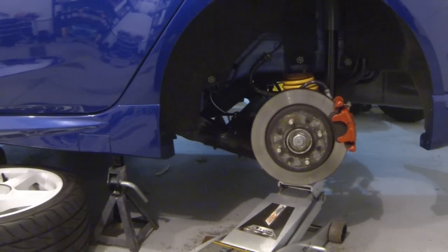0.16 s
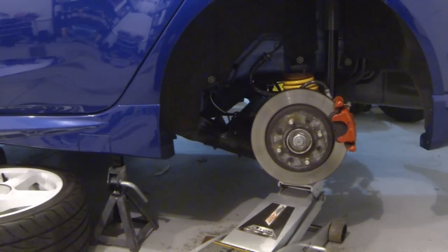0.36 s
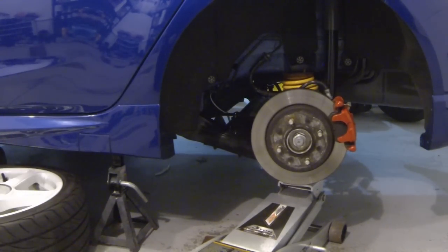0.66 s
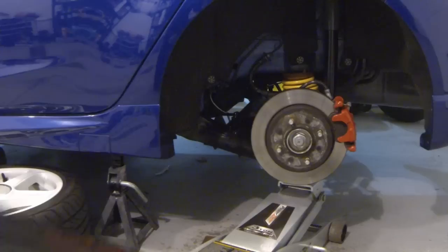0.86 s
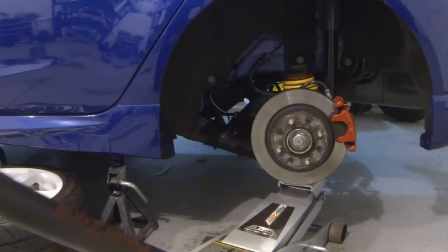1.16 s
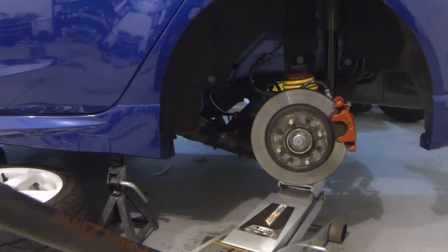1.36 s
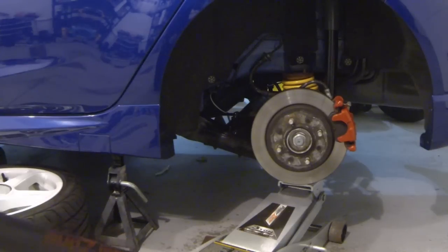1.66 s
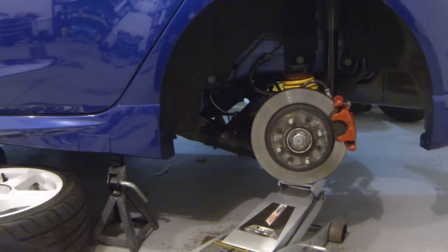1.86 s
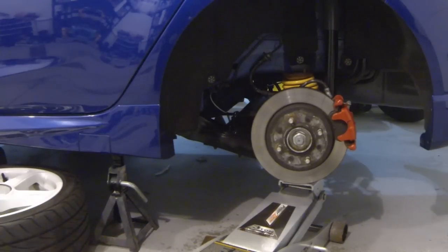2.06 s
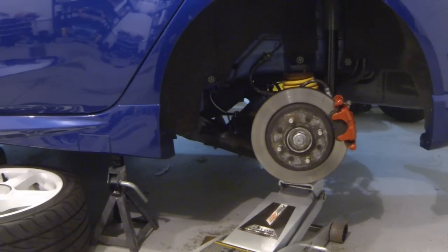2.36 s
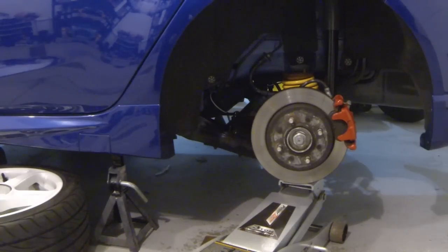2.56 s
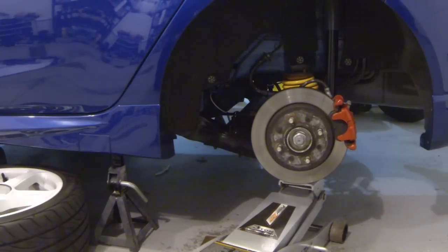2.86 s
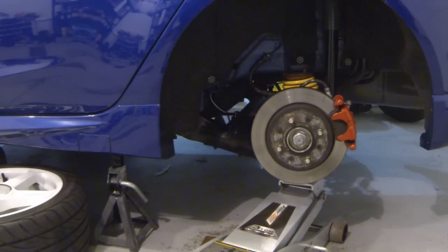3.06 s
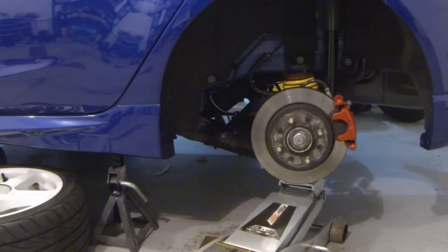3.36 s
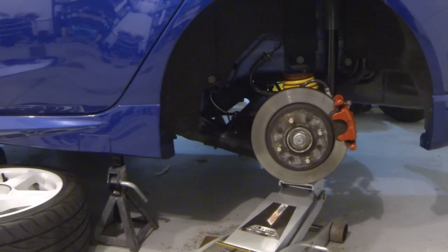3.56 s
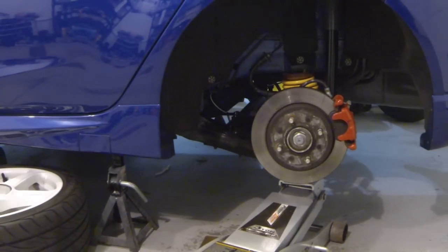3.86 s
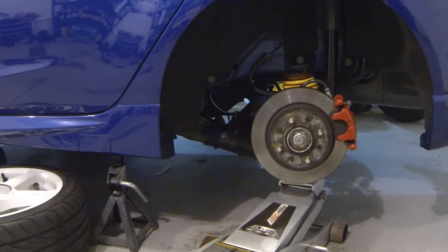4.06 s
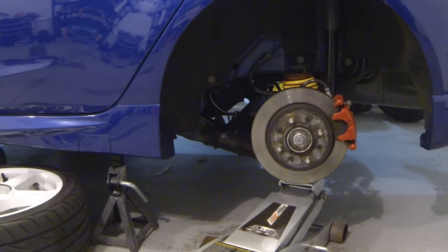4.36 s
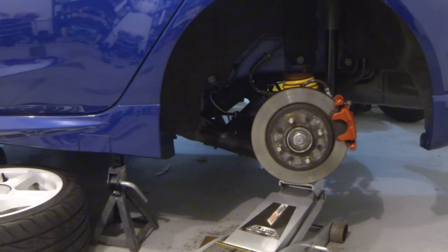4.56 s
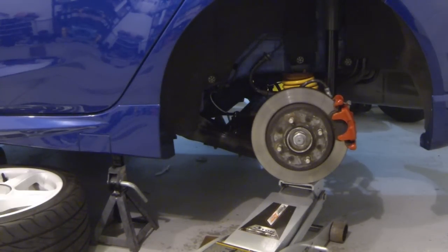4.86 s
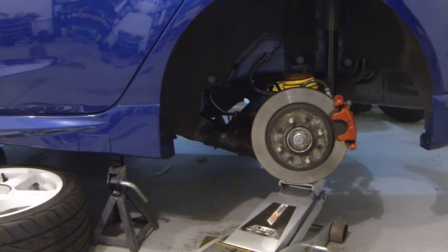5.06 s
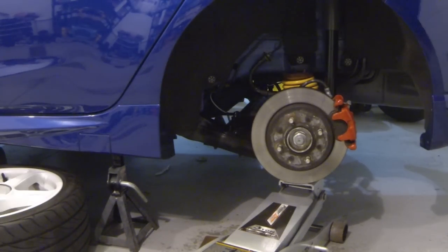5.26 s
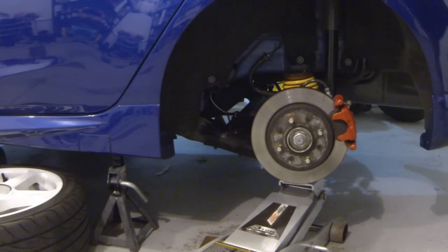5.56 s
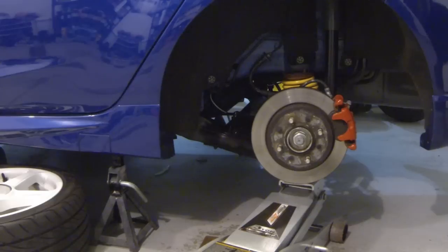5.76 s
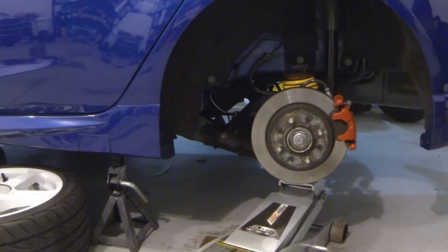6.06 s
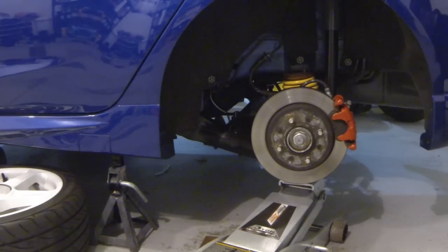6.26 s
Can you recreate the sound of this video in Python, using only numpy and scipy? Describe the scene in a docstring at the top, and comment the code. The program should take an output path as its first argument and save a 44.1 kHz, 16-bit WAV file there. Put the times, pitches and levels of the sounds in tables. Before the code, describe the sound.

In a humming garage, a metal jack handle clicks and creaks, then a heavy ringing thump, followed by shoes stepping and scuffing on gritty concrete.

```python
"""A car is raised on a hydraulic floor jack in a garage, over a ventilation hum of filtered noise.
First the handle clacks and turns: shaped pulses, slip ticks and ringing tube modes. Just after 2 s it hits
its stop with a heavy thump: dull blows, low jolts, a ringing steel frame and a buzz of loose parts.
Then someone steps about on gritty concrete and drags a shoe: knocks, thuds and slaps, low booms, bursts of
grit and scuffs of coloured grain noise. One last handle clack falls among the steps."""
import sys
import numpy as np
from scipy import signal
from scipy.fft import rfft, irfft, next_fast_len
from scipy.io import wavfile
from scipy.ndimage import uniform_filter1d

SR = 44100
rng = np.random.default_rng(int(sys.argv[2]) if len(sys.argv) > 2 else 0)


def generate_wav(sig):
    """Save sig (samples, or channels by samples) to the path in sys.argv[1] as 16-bit PCM at SR."""
    pcm = np.round(np.clip(np.atleast_2d(sig).T, -1, 1) * 32767).astype(np.int16)
    wavfile.write(sys.argv[1], SR, pcm)


N = 282681
TIME = np.arange(N) / SR
BINS = np.fft.rfftfreq(4096, 1 / SR)  # pitch of each bin of a pulse spectrum, Hz
BLOW = np.sqrt(.004 * SR)  # a blow's level is its rms over 4 ms


def amp(db):
    """Turns decibels into an amplitude factor."""
    return 10 ** (np.asarray(db) / 20)


def evened(x):
    """Brings x to an rms of 1."""
    return x / np.sqrt(np.mean(x ** 2) + 1e-20)


def read(points, hz):
    """Reads a curve drawn through points along a logarithmic pitch axis."""
    pitch_hz, value = np.transpose(points)
    return np.interp(np.log(hz + 1), np.log(pitch_hz + 1), value)


def spectrum(colour):
    """Turns a colour curve into the amplitudes of a pulse spectrum."""
    return amp(read(colour, BINS))


def add(mix, start_s, sound):
    """Mixes a sound in at its start time, cut off at the end of the mix."""
    part = mix[..., round(start_s * SR):][..., :sound.shape[-1]]
    part += sound[..., :part.shape[-1]]


def coloured(x, colour):
    """Gives x a spectrum, at unit level."""
    size = next_fast_len(len(x))
    gain = amp(read(colour, np.fft.rfftfreq(size, 1 / SR)))
    return evened(irfft(rfft(x, size) * gain, size)[:len(x)])


def grains(per_s, spread_db):
    """A random train of clicks of uneven size."""
    size = amp(spread_db * np.minimum(rng.exponential(1, N), 4)) * rng.standard_normal(N)
    return size * (rng.random(N) < per_s / SR)


def band(hz, width):
    """Noise through one resonance, at unit level."""
    size = next_fast_len(N)
    detune = 2 * (np.fft.rfftfreq(size, 1 / SR) - hz) / width
    noise = rfft(rng.standard_normal(size))
    return evened(irfft(noise / (1 + detune ** 2), size)[:N])


def swell(u):
    """Rises from nothing to 1 at u = 1, then dies away more slowly."""
    u = np.maximum(u, 0)
    return u * np.exp(1 - u)


def pulse(gain, spread=0.0014, spread_hz=1500):
    """A causal pulse with this spectrum; bending waves spread it, the treble arriving first."""
    # folding the cepstrum forward in time gives the minimum-phase pulse
    cepstrum = irfft(np.log(gain + 1e-9))
    cepstrum[1:len(BINS) - 1] *= 2
    cepstrum[len(BINS):] = 0
    lag = 2 * np.pi * spread * spread_hz * np.arctan(BINS / spread_hz)
    return BLOW * irfft(np.exp(rfft(cepstrum) - 1j * lag))


def contact(hz, centre_hz, sharpness=1):
    """A blow is strongest near the pitch that its contact sets."""
    return 1 / np.hypot(1, sharpness * (hz / centre_hz - centre_hz / (hz + 0.0018)))


def ring(modes, weights, onset=0.0015):
    """Dying sines that swell over the time of contact, every other mode swinging the opposite way."""
    t = TIME[:SR]
    sines = np.zeros(SR)
    for k, (hz, db, t60) in enumerate(modes):
        sines += (-1) ** k * weights[k] * amp(db - 60 * t / t60) * np.sin(2 * np.pi * hz * t)
    return sines * (1 - np.exp(-(t / onset) ** 2)) ** 2


def placed(sound, room_db):
    """Two rows: what is heard straight and what goes into the room."""
    return np.outer([1, amp(room_db)], sound)


# Spectrum of the steady air noise: pitch_hz, level_db
AIR_COLOUR = [(12, -31), (20, 2), (92, -4), (118, -7.5), (174, -14), (211, -14), (235, -15.5), (302, -16),
              (398, -18.5), (497, -20.5), (966, -24.5), (1730, -29.5), (2930, -31.5), (4820, -35.5),
              (15000, -48.5)]
# Fan and duct tones, the widest a broad wash: pitch_hz, width_hz, level_db
HUM_TONES = [(58.9, 15, -64.5), (524, 30, -83), (903, 35, -89), (1656, 64, -86.5), (2999, 3.1, -81.5),
             (2983, 1050, -71)]
# Level of the low drone, which swells and then sinks before 2 s: time_s, level_db
DRONE_LEVEL = [(0, -64), (.4, -58.5), (1.3, -60.5), (1.7, -70), (6.41, -69.5)]
AIR_DB = -56.42


def ventilation():
    """Air noise with a few wavering tones and a low drone, all filtered from noise."""
    out = amp(AIR_DB) * coloured(rng.standard_normal(N), AIR_COLOUR)
    out += amp(np.interp(TIME, *np.transpose(DRONE_LEVEL))) * band(hz=82.3, width=9.5)
    for hz, width, db in HUM_TONES:
        out += amp(db) * band(hz, width)
    return out


# Spectrum of the heel, for the shuffle and the steps: pitch_hz, level_db
HEEL_COLOUR = [(10, -33), (150, 6), (400, 6), (1050, 2), (1450, -34), (3000, -49), (15000, -55)]
SHUFFLE_FROM_S, SHUFFLE_TO_S, SHUFFLE_PER_S = 3.2, 4.95, 30
SHUFFLE_DB, SHUFFLE_HZ = -67.5, 202


def shuffle():
    """Soft random bumps of the shoes as the weight shifts between the footfalls."""
    bump = pulse(spectrum(HEEL_COLOUR) * contact(BINS, SHUFFLE_HZ, sharpness=0.92))
    moving = (TIME > SHUFFLE_FROM_S) & (TIME < SHUFFLE_TO_S)
    taps = rng.uniform(0.82, 1, N) * (rng.random(N) < SHUFFLE_PER_S / SR)
    bumps = evened(signal.fftconvolve(taps, bump)[:N])
    return placed(amp(SHUFFLE_DB) * moving * bumps, room_db=-9.5)


# Soft booms of the weight shifting: start_s, level_db, pitch_hz
WEIGHT_BOOMS = [(3.373, -29.5, 108), (3.392, -42.5, 223), (3.509, -39.5, 252), (3.515, -37, 117),
                (3.532, -39.5, 235), (3.556, -42, 163), (3.665, -40.5, 165), (3.685, -34, 124),
                (3.719, -40, 98)]
BOOM_WIDTH_HZ = 51


def booms():
    """Each boom is a pulse with its own pitch that dies within a few cycles."""
    out = np.zeros(N)
    for start_s, db, hz in WEIGHT_BOOMS:
        resonance = contact(BINS, hz, hz / BOOM_WIDTH_HZ) ** 2
        add(out, start_s, amp(db) * pulse(evened(resonance)))
    return placed(out, room_db=-11.5)


# Single grains snapping: start_s, level_db
GRAIN_SNAPS = [(3.566, -51), (4.812, -58.5), (4.817, -66)]
# Spectrum of a snap: pitch_hz, level_db
SNAP_SPECTRUM = [(1000, -14), (4500, -10), (5700, 6), (7300, -13), (10000, -5), (12600, -10), (15000, -28)]


def snaps():
    """A lone grain of sand breaks with one thin, crisp tick."""
    out = np.zeros(N)
    tick = pulse(evened(spectrum(SNAP_SPECTRUM)), spread=0.0003, spread_hz=7200)
    for start_s, db in GRAIN_SNAPS:
        add(out, start_s, amp(db) * tick)
    return placed(out, room_db=-10)


# Grit cracking under a sole, peaking at half its length: start_s, level_db, length_s, brightest_pitch_hz
GRIT_BURSTS = [(3.374, -49.5, .007, 1630), (3.401, -55, .004, 1700), (3.464, -56.5, 0.0085, 5200),
               (3.488, -45.5, .003, 1710), (3.498, -54.5, 0.0053, 4400), (3.548, -52, 0.0035, 4800),
               (3.559, -44.5, 0.002, 4900), (3.565, -42, 0.0033, 7000), (3.581, -50.5, 0.0052, 5200),
               (3.608, -52, 0.0064, 5230), (3.665, -59, 0.011, 1190), (4.134, -52, 0.0042, 4070),
               (4.1662, -49, 0.0033, 5000), (4.1694, -45.5, 0.0032, 7860), (4.2012, -52, .002, 4400)]
# Spectrum of cracking grit: pitch_hz, level_db
GRIT_SPECTRUM = [(300, -14), (900, 19.5), (1500, 12), (2600, 6.5), (3700, 7.5), (4350, -1.5), (5100, 6.5),
                 (6100, -9.5), (6800, -9.5), (7900, -17), (9200, -4), (10000, -4), (10700, -22),
                 (12000, -8), (15000, -22)]
CRUMBS_DB, CRUMBS_LENGTHS = -25.5, 8.1  # the crumbs crackle on, softer and this many times longer


def grit():
    """Sand grains burst under the shoe in brief clusters, then crumble; finer grains sound higher."""
    out, t = np.zeros(N), TIME[:SR // 4]
    hz, colour_db = np.transpose(GRIT_SPECTRUM)
    for start_s, db, length, centre_hz in GRIT_BURSTS:
        tilt_db = 20 * np.log10(contact(hz, centre_hz, sharpness=1.8))
        colour = np.transpose([hz, colour_db + tilt_db])
        u = t / (length / 2)
        burst = swell(u) + amp(CRUMBS_DB) * swell(u / CRUMBS_LENGTHS)
        crackle = coloured(grains(per_s=16000, spread_db=3.0)[:len(t)], colour)
        add(out, start_s, amp(db) * burst * crackle)
    return placed(out, room_db=-9.0)


# Scuffs of a sole on concrete: start_s, time_to_top_speed_s, rub_db, rasp_db, sandy_hiss_db
SOLE_SCUFFS = [(2.93, 0.15, -66.5, -69.5, -80), (3.37, 0.17, -58, -62.5, -73), (3.98, 0.12, -63, -70, -72),
               (4.2, 0.023, -57, -53.5, -71), (4.23, 0.048, -58, -60, -81), (4.3, 0.3, -62.5, -78, -90),
               (4.75, 0.07, -58.5, -67, -72), (5.28, 0.16, -63, -60.5, -60.5), (5.395, .045, -54, -72, -60),
               (5.49, 0.051, -59.5, -64, -60.5), (5.54, 0.074, -57.5, -58.5, -67),
               (5.61, 0.066, -58, -57.5, -68), (5.66, 0.2, -62.5, -63.5, -66.5)]
# Spectrum of the dull rub: pitch_hz, level_db
RUB_COLOUR = [(60, -19), (200, -6.5), (360, 0), (480, -3), (620, 2), (920, 2.5), (1200, -13), (2600, -15),
              (4000, -20), (7000, -67), (15000, -52)]
# Spectrum of the tread catching: pitch_hz, level_db
RASP_COLOUR = [(200, -25), (900, 0.5), (1500, 1.5), (2100, -0.5), (2900, -1), (3800, -4.5), (4600, -18),
               (7000, -32), (15000, -47)]
# Spectrum of the rolling grains: pitch_hz, level_db
SAND_COLOUR = [(500, 0), (2000, -10.5), (3800, 4), (4500, -2), (5300, 2), (6800, -10.5), (9500, -10.5),
               (11000, -16), (13500, -17), (15000, -23)]
RUB_POWER, RASP_POWER, SAND_POWER = 1.22, 2.65, 3  # how each follows the speed


def slides(uneven_db=1.2, uneven_s=0.02):
    """The sole speeds up and coasts to rest, gripping unevenly: dull rub, rasping tread, sandy grains."""
    rub_level, rasp_level, sand_level = np.zeros((3, N))
    for start_s, rise_s, rub_db, rasp_db, sand_db in SOLE_SCUFFS:
        speed = swell((TIME - start_s) / rise_s)
        # overlapping scuffs add in power
        rub_level = np.hypot(rub_level, amp(rub_db) * speed ** RUB_POWER)
        rasp_level = np.hypot(rasp_level, amp(rasp_db) * speed ** RASP_POWER)
        sand_level = np.hypot(sand_level, amp(sand_db) * speed ** SAND_POWER)
    rub = rub_level * coloured(grains(per_s=2500, spread_db=0.5), RUB_COLOUR)
    rasp = rasp_level * coloured(grains(per_s=6000, spread_db=1.0), RASP_COLOUR)
    sand = sand_level * coloured(grains(per_s=6500, spread_db=1.5), SAND_COLOUR)
    grip = evened(uniform_filter1d(rng.standard_normal(N), round(uneven_s * SR)))
    return placed(amp(uneven_db * grip) * (rub + rasp + sand), room_db=-13)


# Footfalls, the last row a hard echo of the 5.400 s step off a nearby surface: start_s, knock_db,
# knock_pitch_hz, thud_db, slap_db, room_db
FOOTFALLS = [(2.629, -47.5, 455, -62, -57, -15), (3.267, -57, 900, -70, -58, -6),
             (3.360, -48.5, 418, -49, -64, 3), (3.376, -47.5, 745, -49, -55, -1),
             (3.487, -37, 440, -39, -43.5, -7.5), (3.582, -41, 416, -41, -60, -7),
             (3.666, -47.5, 710, -46, -59, -5.5), (3.672, -50, 600, -51, -60, -8.5),
             (3.8318, -49, 417, -51, -54.5, -9.5), (4.1282, -40.5, 710, -43.5, -55, -2.5),
             (4.2012, -38, 980, -53, -48, -7), (4.247, -44, 570, -68, -56, -25),
             (4.336, -48.5, 345, -49, -81, -7), (4.358, -44, 221, -53, -69, -8),
             (4.604, -61, 750, -62, -74, -8), (4.639, -51, 353, -55, -68, -5.5),
             (4.763, -46.5, 228, -47.5, -78, -3.5), (4.785, -55, 750, -62, -60, -2),
             (4.805, -52, 400, -48, -70, -5), (4.8697, -40.5, 438, -51, -60, -4.5),
             (5.143, -52.5, 320, -46.5, -61, -8.5), (5.325, -52, 520, -48.5, -72, 5.5),
             (5.400, -35.5, 515, -43, -49.5, -3.5), (5.4119, -39, 700, -52, -62, 1)]
# Spectrum of the weight coming down: pitch_hz, level_db
THUD_COLOUR = [(8, -21), (40, 5.5), (70, -4.5), (112, -2), (160, -11), (205, -9), (245, 0), (300, -29),
               (1000, -38), (15000, -88)]
# Spectrum of the flat of the sole: pitch_hz, level_db
SLAP_COLOUR = [(200, -16), (800, 18), (1100, 10.5), (1700, 17.5), (2300, -7.5), (3600, 7), (6000, -46),
               (15000, -43)]
ROLL_S, ROLL_DB = 0.00645, -18  # the ball of the foot lands after the heel, softer


def steps(sharpness=2.5):
    """Each footfall blends a heel knock, a thud of weight and a slap of the sole, then rolls forward."""
    out = np.zeros((2, N))
    heel = evened(spectrum(HEEL_COLOUR))
    thud = evened(spectrum(THUD_COLOUR))
    slap = evened(spectrum(SLAP_COLOUR))
    for start_s, knock_db, hz, thud_db, slap_db, room_db in FOOTFALLS:
        knock = evened(heel * contact(BINS, hz, sharpness))
        power = amp([knock_db, thud_db, slap_db]) ** 2 @ np.array([knock, thud, slap]) ** 2
        add(out, start_s, placed(pulse(np.sqrt(power), spread=0.00091), room_db))
        ball = amp(knock_db + ROLL_DB) * pulse(knock, spread=0.00063)
        add(out, start_s + ROLL_S, placed(ball, room_db))
    return out


# What the handle rings with: pitch_hz, level_db, t60_s
HANDLE_MODES = [(313, -8.5, 0.48), (513, -1, 0.53), (590, -4.5, 0.39), (798, -17, 0.32), (858, -6.5, 0.2),
                (917, -4.5, 0.31), (1020, -6, 0.095), (1095, -27, 0.48), (1385, -7, 0.14),
                (1453, -8, 0.093), (1630, -16, 0.21), (1690, -16.5, 0.3), (1778, -2, 0.067),
                (1950, -26, .4)]


def tube_ring(centre_hz, sharpness=1.7, onset=0.0015):
    """The handle tube rings most in the modes near the pitch of the contact."""
    weights = contact(np.transpose(HANDLE_MODES)[0], centre_hz, sharpness)
    return ring(HANDLE_MODES, weights, onset)


# Turns of the handle in its socket: start_s, length_s, level_db
HANDLE_TURNS = [(0.486, 0.18, -65.5), (0.586, 0.035, -63), (0.684, .13, -63), (0.847, 0.037, -64.5),
                (1.352, 0.079, -65), (1.46, 0.035, -62)]
# Spectrum of the handle's ticks and clacks: pitch_hz, level_db
CLACK_SPECTRUM = [(20, -40), (350, 4), (600, 5), (740, -0.5), (950, 3.5), (1220, -4.5), (1450, 1),
                  (1800, -6.5), (2400, -7), (3500, -17), (8000, -77), (15000, -93)]


def twist(arch=0.35, tick_db=-1):
    """Tiny slips in the socket tick and keep the tube ringing; each turn swells and eases off."""
    slips = grains(per_s=200, spread_db=1.5)
    tube = signal.fftconvolve(slips, tube_ring(1000))[:N]
    tick = pulse(spectrum(CLACK_SPECTRUM) * contact(BINS, 1200, sharpness=0.86))
    ticks = signal.fftconvolve(slips, tick)[:N]
    effort = np.zeros(N)
    for start_s, length, db in HANDLE_TURNS:
        progress = np.clip((TIME - start_s) / length, 0, 1)
        effort += amp(db) * abs(np.sin(np.pi * progress)) ** arch
    friction = evened(evened(tube) + amp(tick_db) * evened(ticks))
    return placed(effort * friction, room_db=-10.5)


# Clacks of the jack handle: start_s, click_db, ring_db, brightest_pitch_hz, change_per_bounce_db
HANDLE_CLACKS = [(0.172, -54, -56, 1160, -12), (0.18, -69, -59, 1770, -11), (0.222, -77, -57.5, 1760, -10),
                 (1.371, -63, -61, 1280, 0.5), (1.394, -66, -63, 1200, -6), (1.472, -58, -61, 916, -4),
                 (1.504, -37.5, -34, 1500, -1), (1.764, -67, -63, 810, -8), (1.965, -54, -59, 1050, -5),
                 (2.391, -65.5, -53, 1700, -10), (5.094, -55, -57, 1947, -13)]
# each bounce comes this much later, at this share of the pitch, and rings the tube less
CHATTER_S, CHATTER_PITCH, CHATTER_RING_DB = .0064, 0.73, -18


def handle(room_db=-3.5):
    """Play in the handle socket: a click and the short ring of the tube, then two quick bounces."""
    out = np.zeros((2, N))
    for start_s, click_db, ring_db, top_hz, bounce_db in HANDLE_CLACKS:
        for k in range(3):
            at, hz = start_s + k * CHATTER_S, top_hz * CHATTER_PITCH ** k
            colour = spectrum(CLACK_SPECTRUM) * contact(BINS, hz, sharpness=2.0) ** 2
            click = pulse(evened(colour), spread=0.00151)
            add(out, at, placed(amp(click_db + k * bounce_db) * click, room_db))
            tube_db = ring_db + k * (bounce_db + CHATTER_RING_DB)
            add(out[0], at, amp(tube_db) * tube_ring(hz))
    return out


# Spectrum of a heavy impact on the jack: pitch_hz, level_db
IMPACT_COLOUR = [(8, -25), (25, 0.5), (60, 33), (200, 12), (380, 7), (640, 12.5), (770, 1.5), (1060, 8.5),
                 (1200, 0), (1600, 0.5), (2100, -16), (4000, -45), (8000, -51), (15000, -57)]


def blow(db, hz, sharpness):
    """One dull impact on the jack."""
    colour = spectrum(IMPACT_COLOUR) * contact(BINS, hz, sharpness)
    return amp(db) * pulse(evened(colour), spread=0.00164)


# Spectrum of the loose steel parts: pitch_hz, level_db
LOOSE_PARTS_COLOUR = [(300, -32), (1900, -2), (2400, 3), (2700, -3.5), (3200, 5.5), (3600, -12), (4050, -4),
                      (4400, -22), (5600, -9.5), (7000, -31), (10500, -32), (11500, -26), (12500, -42)]


def loose_parts(level_db=-50, rise_s=0.018, t60_s=0.8):
    """Loose steel parts buzz as a dense train of grains that builds quickly and dies away."""
    buzz = coloured(grains(per_s=3700, spread_db=1.5), LOOSE_PARTS_COLOUR)
    return buzz * (1 - np.exp(-TIME / rise_s)) * amp(level_db - 60 * TIME / t60_s)


# What the loaded jack frame rings with: pitch_hz, level_db, t60_s
FRAME_MODES = [(28.8, 5, 0.88), (59, 5, 0.45), (82, -7, 0.44), (111, -2, 0.29), (201.4, 1.5, 0.37),
               (239.6, -1, 0.54), (430, -22, 0.33), (492, -13, 0.34), (511, 2, 0.33), (603, -12, 0.42),
               (646, 0, 0.25), (680, -16, 0.21), (670, -6, 0.19), (912, -19, 0.38), (991, -2, 0.19),
               (1080, -16, 0.29), (1110, -13, 0.66), (1290, -16, 0.45), (1324, -15, 0.6), (1388, -1, 0.12),
               (1685, -22, .9), (2415, -18, 0.46), (3000, -20, 1.1), (3230, -30, 0.92), (3980, -33, 0.5)]
# The handle hits its stop and clatters against it: start_s, level_db, pitch_hz
STOP_HITS = [(2.1249, -31.5, 930), (2.1285, -29, 690), (2.1351, -43, 556), (2.145, -34.5, 1510),
             (2.1605, -35, 644), (2.168, -43, 900), (2.198, -39, 800), (2.211, -48, 600)]
# The car's weight answers with low jolts: start_s, level_db
LOAD_JOLTS = [(2.14, -31), (2.151, -30), (2.176, -38), (2.189, -32), (2.211, -32.5), (2.378, -40.5)]
TOUCH_S, TOUCH_DB, TOUCH_HZ, TOUCH_RISE_S = 2.115, -34, 1000, 0.0021  # slack taken up just before the hit
FRAME_S, FRAME_DB, JOLT_HZ, BUZZ_S = 2.13, -39, 111, 2.12


def thump(room_db=-6, load_room_db=-13):
    """The handle hits its stop and clatters; the load jolts, the frame rings and loose parts buzz."""
    out = np.zeros((2, N))
    add(out[0], TOUCH_S, amp(TOUCH_DB) * tube_ring(TOUCH_HZ, sharpness=6.1, onset=TOUCH_RISE_S))
    for start_s, db, hz in STOP_HITS:
        add(out, start_s, placed(blow(db, hz, sharpness=0.63), room_db))
    for start_s, db in LOAD_JOLTS:
        add(out, start_s, placed(blow(db, JOLT_HZ, sharpness=0.76), load_room_db))
    add(out[0], FRAME_S, amp(FRAME_DB) * ring(FRAME_MODES, np.ones(len(FRAME_MODES))))
    add(out[0], BUZZ_S, loose_parts())
    return out


# Reflections off floor, car and walls, inverted where negative: delay_s, share
NEAR_ECHOES = [(.0058, 0.34), (0.0137, 0.32), (0.0147, .36), (.0225, -0.21)]
# How long the room's tail lasts: pitch_hz, t60_s
TAIL_DECAY = [(60, 1), (250, 0.87), (900, 0.64), (3000, 0.78), (8000, 0.72), (15000, 0.22)]


def garage(x, build=0.0028):
    """A few near reflections, then a dense tail in which each band dies at its own speed."""
    taps = rng.choice([-1., 1.], SR) * (rng.random(SR) < 4000 / SR)
    hz, t, z = signal.stft(taps, SR, nperseg=256)
    decay = amp(-60 * t / read(TAIL_DECAY, hz)[:, None])
    tail = signal.istft(z * decay, SR, nperseg=256)[1][:SR]
    tail = tail * (1 - np.exp(-(TIME[:SR] / build) ** 2))
    tail /= np.linalg.norm(tail)
    for delay, share in NEAR_ECHOES:
        tail[round(delay * SR)] += share
    return signal.fftconvolve(x, tail)[:N]


def scene():
    """Jack, feet and friction each stand in their own spot, so each has its own room tail."""
    out = ventilation()
    friction = grit() + snaps() + slides()
    feet = steps() + booms() + shuffle()
    jack = handle() + twist() + thump()
    for direct, to_room in (friction, feet, jack):
        out += direct + garage(to_room)
    return out[None]


def record(dry):
    """The recorder's band limit: a steep low-pass."""
    lowpass = signal.firwin(511, 15200, window=("kaiser", 9), fs=SR)  # edge in Hz
    return signal.oaconvolve(dry, lowpass[None], "same")


dry = scene()
out = record(dry)
generate_wav(out)
```